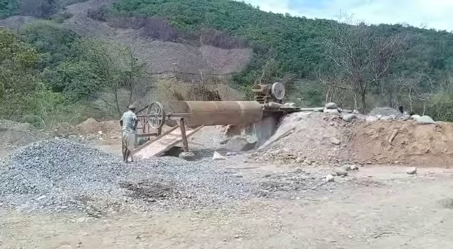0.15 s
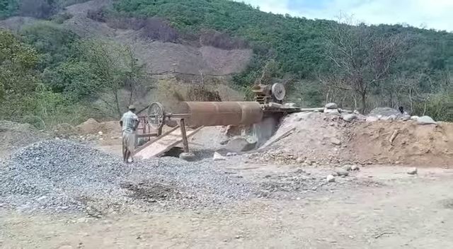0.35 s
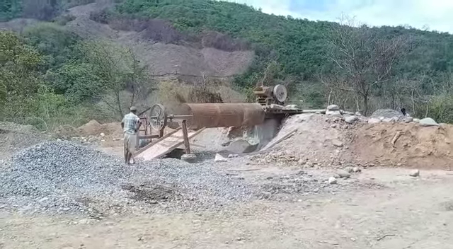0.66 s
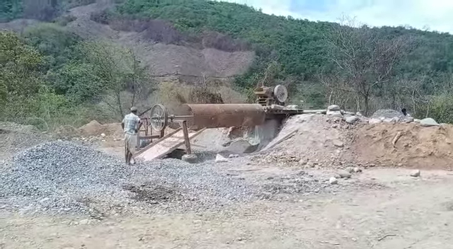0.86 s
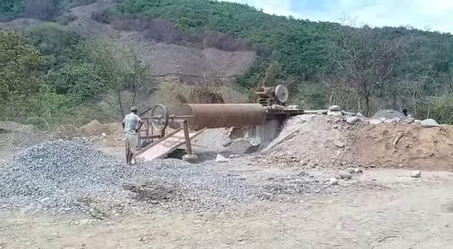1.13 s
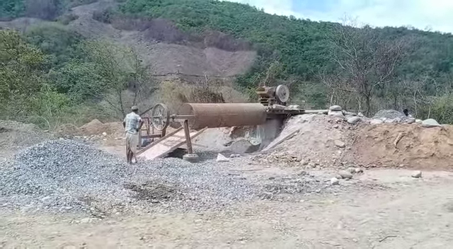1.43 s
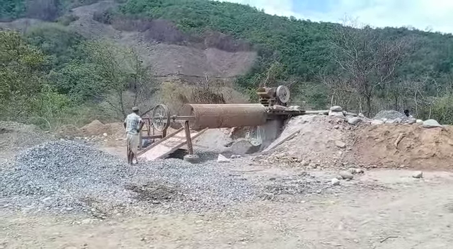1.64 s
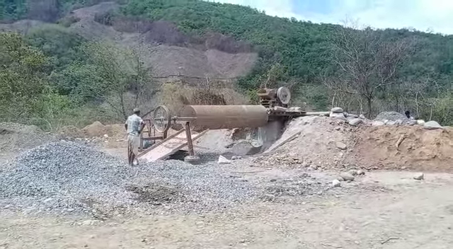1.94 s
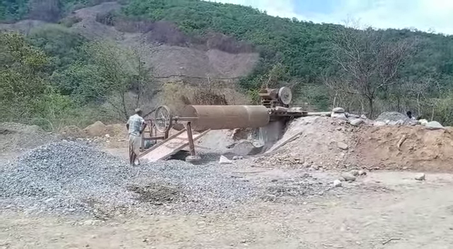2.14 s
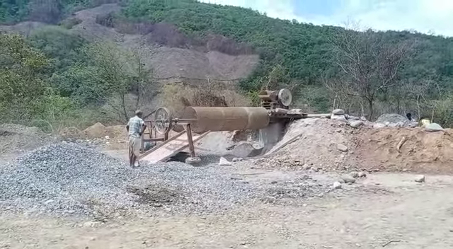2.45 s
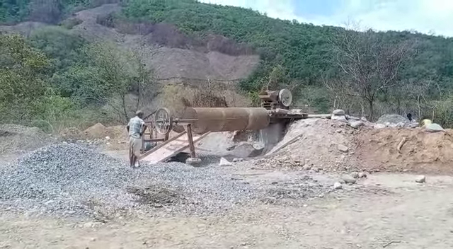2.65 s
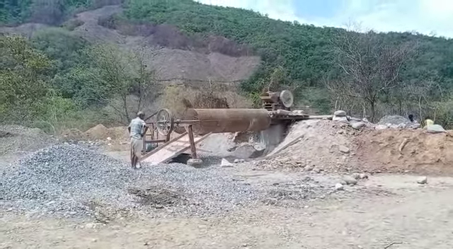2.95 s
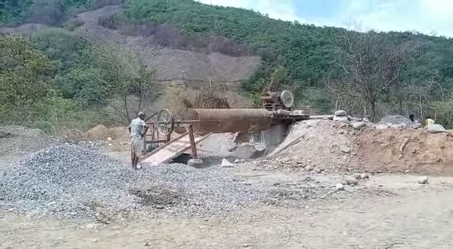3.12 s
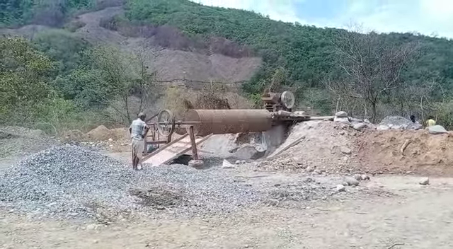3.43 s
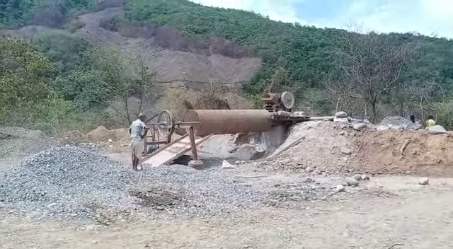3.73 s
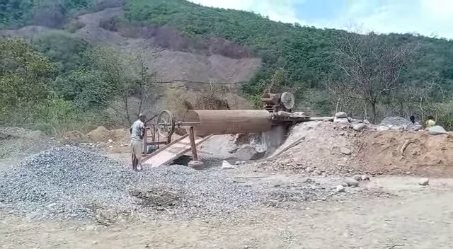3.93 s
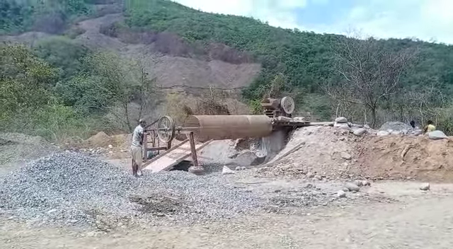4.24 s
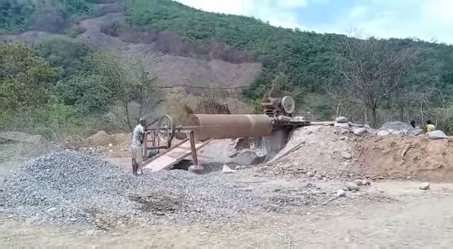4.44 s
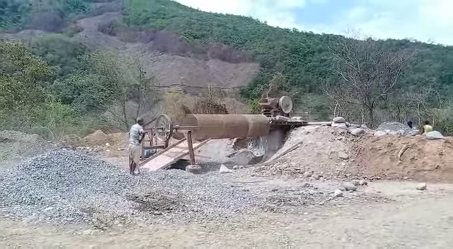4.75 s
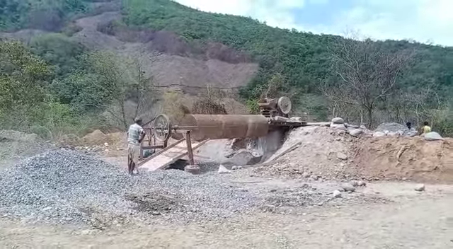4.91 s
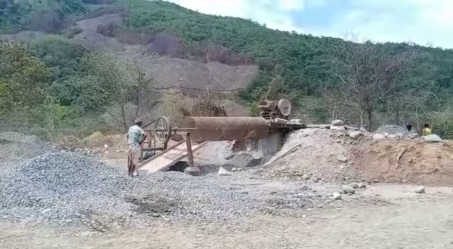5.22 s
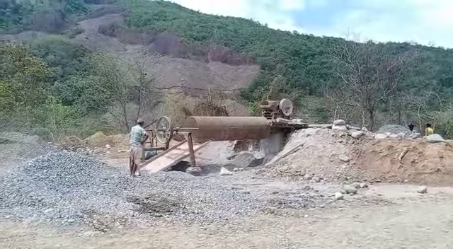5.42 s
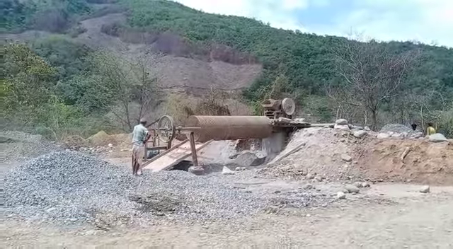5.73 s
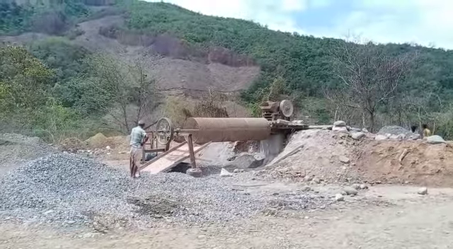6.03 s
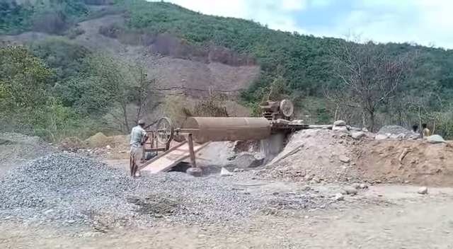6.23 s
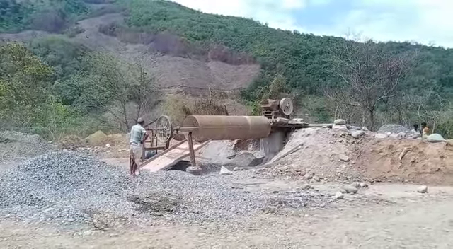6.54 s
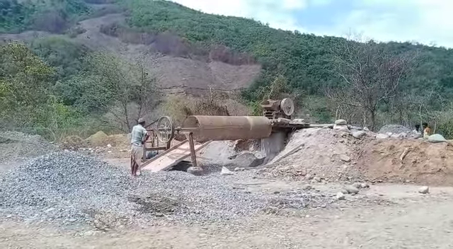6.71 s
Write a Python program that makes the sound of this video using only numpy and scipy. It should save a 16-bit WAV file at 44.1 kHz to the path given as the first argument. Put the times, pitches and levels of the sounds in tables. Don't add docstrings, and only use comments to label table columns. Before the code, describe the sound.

Outdoors at some distance, crushed stone rattles and roars continuously through a turning steel drum, with sharp clinks, gritty spills, rapid dull crusher thumps and motor hum.

```python
import sys
import numpy as np
from scipy import signal
from scipy.fft import rfft, irfft
from scipy.io import wavfile
from scipy.ndimage import map_coordinates

SR = 44100
rng = np.random.default_rng(int(sys.argv[2]) if len(sys.argv) > 2 else 0)


def attenuation_scalar(level_db):
    decades = np.asarray(level_db, float) / 20
    return 10 ** decades


def master_out(mix):
    frames = np.transpose(np.atleast_2d(mix))
    ceiling = np.clip(frames, -1, 1)
    pcm = np.round(ceiling * 32767).astype(np.int16)
    wavfile.write(sys.argv[1], SR, pcm)


N = 302967

# (time [s], share turning [0-1], share turned [0-1]); the rest faces the plant
HEADING = [
    (0, 0.08, 0.06),
    (3.95, 0.24, 0.04),
    (4.08, 0.26, 0.1),
    (4.2, 0.8, 0),
    (4.5, 0.96, 0.39),
    (4.68, 0.48, 0.24),
    (4.85, 0.2, 0.66),
    (5.8, 0.04, 0.81),
    (6.87, 0.06, 0.88),
]
STROKE_S, FIRST_S = 0.1905, 0.106


def unit(x):
    return x / np.sqrt(np.mean(x ** 2) + 1e-20)


def curves(rows):
    s, *cols = np.transpose(rows)
    return [np.interp(np.arange(N) / SR, s, c) for c in cols]


def wobble(rate):
    knots = rng.standard_normal(int(N * rate / SR) + 4)
    return map_coordinates(knots, [np.arange(N) * rate / SR])


def coloured(x, points, size=16384):
    f, db = np.transpose(points)
    bins_hz = np.fft.rfftfreq(size, 1 / SR)
    gain = attenuation_scalar(np.interp(np.log(bins_hz + 1), np.log(f + 1), db))
    cep = irfft(np.log(gain + 1e-6))
    cep[1:size // 2] *= 2
    cep[size // 2 + 1:] = 0
    impulse = irfft(np.exp(rfft(cep)))[:size // 2]
    return unit(signal.fftconvolve(x, impulse)[:N])


def motor():
    orders = {2: -73, 4: -60.5, 14: -62.5, 21: -66.5, 22: -55, 23: -58.5, 24: -54.5, 26: -50, 27: -63, 29:
              -61}
    shaft_hz = 25.386
    t = np.arange(N) / SR
    hum = np.zeros(N)
    for k, db in orders.items():
        turns = k * shaft_hz * t + rng.random()
        hum += attenuation_scalar(db + 3.0 + 0.5 * wobble(1.47)) * np.sin(2 * np.pi * turns)
    return hum


def strokes():
    # (time [s], level [dB])
    breaking = [(0.116, -33.5), (0.461, -31.5), (0.682, -29), (0.866, -31.5), (1.098, -31), (1.248, -32),
                (1.481, -33), (1.625, -35), (2.018, -27.5), (2.238, -35), (2.571, -35), (2.794, -33),
                (3.116, -33.5), (3.333, -33.5), (3.509, -35), (3.71, -34.5), (3.95, -35), (4.277, -31.5),
                (4.476, -32), (4.659, -31), (4.843, -30.5), (5.07, -32), (5.418, -33.5), (5.599, -30),
                (5.831, -32.5), (6, -29.5), (6.173, -31.5), (6.357, -31), (6.593, -35), (6.784, -36.5)]
    idle_db, frame_hz = -35.5, 185.3
    beat = np.arange(FIRST_S, N / SR, STROKE_S)
    draw = rng.standard_normal((3, len(beat)))
    times = beat + 0.0123 * draw[0]
    rows = np.transpose([times, idle_db + 1.5 * draw[1], frame_hz * (1 + 0.0066 * draw[2])])
    for s, db in breaking:
        rows[np.abs(beat - s).argmin(), :2] = s, db
    return rows


def crusher():
    # (frequency [Hz], level [dB per Hz])
    rumble_colour = [(20, -55), (45, -57), (70, -19), (110, -14.5), (140, -3.5), (185, -6), (230, -5),
                     (300, -47)]
    crunch_colour = [(90, -34), (150, -6.5), (183, -5), (215, -4.5), (260, -16.0), (350, -22.5), (480, -57.0)]
    lumps_colour = [(200, -37), (250, -0.5), (330, -7.0), (420, -13.5), (520, -17.0), (600, -40.5)]
    lead = SR // 8
    t = np.arange(-lead, lead) / SR
    knocks, load = np.zeros((2, N + SR))
    white = rng.standard_normal((3, N))
    for s, db, hz in strokes():
        at = round(s * SR)
        swell = 0.4 * np.exp(-(t / 0.014) ** 2) + 0.68 * np.exp(-np.abs(t / 0.058) ** 3)
        knocks[at:][:len(t)] += attenuation_scalar(db - 1.0) * swell * np.sin(2 * np.pi * hz * t)
        load[at:][:len(t)] += attenuation_scalar(db - 7.5) * np.exp(-(t / 0.069) ** 2)
    crunch = load[lead:lead + N] * coloured(white[2], crunch_colour)
    bite = np.cos(2 * np.pi * (np.arange(N) / SR - FIRST_S) / STROKE_S)
    rumble = attenuation_scalar(-46.5 + 1.9 * wobble(9)) * coloured(white[0], rumble_colour)
    lumps = attenuation_scalar(-46.5 + 1.8 * bite + 2.3 * wobble(14)) * coloured(white[1], lumps_colour)
    return knocks[lead:lead + N] + crunch + rumble + lumps


def clinks():
    # (time [s], crack [dB], middle mode ring [dB], top mode over the middle one [dB])
    big_stones = [(1.246, -11.5, -28, 8), (1.6412, -15, -23, -3), (1.8163, -11, -14, -8),
                  (2.1256, -11, -25, 10), (2.3082, -11, -21, 3), (2.5303, -6, -25, 4),
                  (2.7843, -12, -15, -4), (3.2525, -13, -23, 1), (3.5897, -5, -23, 3), (3.733, -8, -21, 11),
                  (3.9943, -13, -12.5, -7), (4.0433, -3, -16, 7), (4.577, -10, -16, 7),
                  (4.6927, -11, -16, -2), (4.7465, -13, -26, 6), (5.4024, -13, -26, 5),
                  (5.631, -12, -15, -3), (6.196, -14, -16, -5), (6.41, -12, -13.5, -6), (6.535, -6, -14, 9),
                  (6.684, -10, -17, -5), (6.8326, -5, -11, 1)]
    # (frequency [Hz], t60 [s])
    wall_modes = [(1250, 0.02), (2650, 0.022), (3800, 0.017)]
    low_mode_db = -29
    out = np.zeros(N + SR)
    t = np.arange(SR // 25) / SR
    onset = 1 - np.exp(-t / 0.00044)
    place = 1 + 0.022 * rng.standard_normal((len(big_stones), len(wall_modes)))
    for (s, crack_db, ring_db, top_db), shift in zip(big_stones, place):
        hit = attenuation_scalar(crack_db - 5 - 60 * t / 0.0095) * np.sin(2 * np.pi * 3600 * t)
        mode_levels = low_mode_db, ring_db, ring_db + top_db
        for (hz, t60), db, k in zip(wall_modes, mode_levels, shift):
            hit += attenuation_scalar(db + 1.0 - 60 * t / t60) * np.sin(2 * np.pi * k * hz * t)
        out[round(s * SR):][:len(t)] += onset * hit
    echo = np.pad(out, (63, 0))[:N]
    return out[:N] + 0.36 * echo


def stones(lo_hz, hi_hz, ring_s, blur, count):
    draw = rng.random((count, 4))
    t = np.arange(640) / SR
    hz = lo_hz + (hi_hz - lo_hz) * draw[:, 1:2]
    size = attenuation_scalar(8.2 * draw[:, 2:3])
    decay = attenuation_scalar(-60 * t / (ring_s * (0.32 + draw[:, 3:])))
    chips = size * decay * np.sin(2 * np.pi * hz * t)
    at = (draw[:, :1] * N).astype(int) + np.arange(len(t))
    hits = np.bincount(at.ravel(), chips.ravel(), N + len(t))[:N]
    band = [(0.8 * lo_hz, -60), (lo_hz, 0), (hi_hz, 0), (1.2 * hi_hz, -60)]
    far = coloured(rng.standard_normal(N), band)
    return np.sqrt(1 - blur) * unit(hits) + np.sqrt(blur) * far


def headed(x, spectra):
    turning, turned = np.clip(curves(HEADING), 0, 1)
    shares = np.abs(1 - turning - turned), turning, turned
    return sum(share * coloured(x, points) for share, points in zip(shares, spectra))


def spills():
    # (time [s], dust peak [dB], grit over dust [dB])
    handfuls = [(0.1834, -25, -12), (0.5267, -20, -13), (0.7444, -26, -14), (0.9253, -27, -10),
                (1.2156, -26, -10), (1.3544, -24, -10), (1.6704, -28, -8), (2.1246, -28, -10),
                (2.2124, -24, -10), (2.7604, -26, -13), (2.8674, -19, -10), (2.9614, -29, -10),
                (3.0594, -28, -10), (3.3618, -30, -10), (3.8854, -26, -10), (4.1114, -25, -10),
                (4.1974, -24, -10), (4.2732, -29, -10), (4.3425, -29, -10), (4.4303, -24, -8),
                (4.7824, -27, -8), (4.9531, -27, -10), (5.0843, -24, -10), (5.1811, -24, -10),
                (5.3814, -22, -11), (5.655, -28, -10), (5.7623, -21, -10), (6.3375, -27, -10),
                (6.49, -24.5, -5), (6.7386, -26, -7)]
    small = [(s * N / SR, -30 + 2.5 * (2 * u - 1), -8) for s, u in rng.random((24, 2))]
    env = np.zeros((2, N + SR))
    t = np.arange(SR // 4) / SR
    fall = attenuation_scalar(-60 * t / 0.23) * (1 - np.exp(-t / 0.0026))
    for s, dust_db, grit_db in list(handfuls) + small:
        peaks_db = np.minimum(dust_db, -21) + np.array([-9, grit_db - 0.5])
        env[:, round(s * SR):][:, :len(t)] += np.outer(attenuation_scalar(peaks_db) ** 2, fall ** 2)
    return env[:, :N]


def stream():
    # (time [s], coarse stone [dB], fines [dB])
    feed = [(0.2, -17.5, -41.5), (0.65, -18, -42), (1.15, -18.5, -43.5), (1.7, -18, -40.5),
            (2.09, -18.5, -43), (2.99, -18.5, -41), (3.67, -19, -44), (4.29, -18, -41), (4.47, -22, -51),
            (4.7, -19, -43.5), (5.81, -19, -39), (6.01, -19, -40.5), (6.8, -19.5, -44.5), (6.87, -18, -41)]
    # (time [s], gravel change [dB], shell change [dB])
    clumps = [(.15, 1.5, 1.5), (.9, 2.5, 1.5), (1.2, -1, 2.5), (1.53, -2.5, 2.5), (1.84, -1, 4),
              (2.16, 3.5, 0.5), (2.35, -2.5, -3), (2.9, 2.5, -1), (3.02, 0.5, 5), (3.25, -2.5, -2),
              (3.57, -0.5, -1), (3.62, 5.5, -0.5), (4.05, 0, 3), (3.77, -1, -2), (3.95, -3.5, 2),
              (4.26, -3, -0.5), (5.15, -2, 2.5), (.5, -1, -2.5), (4.57, -1, 1.5), (5.32, -3, 0.5),
              (5.62, -2, 0.5), (5.78, 2, -3.5), (5.83, -1.5, -1), (5.88, 2, 2), (6.01, -1, -0.5),
              (6.43, -4, 1), (6.53, 1.5, -3), (6.72, -3.5, -0.5), (6.76, 2.5, -0.5)]
    clump_s = 0.021
    gravel_db, dust_db = curves(feed)
    turning, turned = curves(HEADING)
    t = np.arange(N) / SR
    gravel_more, shell_more = sum(np.outer(db, np.exp(-((t - s) / clump_s) ** 2)) for s, *db in clumps)
    shell_db = np.mean(gravel_db) - 7 - turned + shell_more
    mean_dust_db = np.mean(dust_db)
    grit_db = mean_dust_db + 0.6 * (dust_db - mean_dust_db) - 1 + 3.5 * turned + 3.5 * turning
    return shell_db, gravel_db + gravel_more + 0.24, grit_db, dust_db + 0.3


def screen():
    # (frequency [Hz], level [dB per Hz])
    shell_colour = [(380, -39.5), (490, -24), (640, -10), (860, -4.5), (980, -9.5), (1250, -0.5),
                    (1560, -9.5), (1980, -1.5), (2250, -8.5), (2620, 1.5), (2900, -9), (3120, -11),
                    (3400, -9), (3800, -48.5)]
    # (frequency [Hz], level [dB per Hz])
    gravel_ahead = [(1760, -41.5), (3000, -9.5), (3110, -21.5), (3350, -6.5), (3630, -11.0), (3970, -4.0),
                    (4290, -7), (4730, -5.0), (5130, -6.5), (5860, -0.5), (6680, -4.5), (7230, -17.5),
                    (7600, -31), (9880, -56), (16700, -120)][:-2] + [(8200, -36), (9000, -120)]
    gravel_turning = [(1760, -54), (3000, -18), (3700, -5.5), (4000, -4.5), (4580, -1.5), (5070, -4.0),
                      (5570, 2.5), (5880, -4.5), (6090, -9), (6380, -19), (7000, -12.5), (7600, -12),
                      (9880, -45), (16700, -120)][:-2] + [(8200, -44), (9000, -120)]
    gravel_turned = [(1760, -32.5), (3000, -45), (3220, -39), (3400, -3.0), (3590, -10.5), (3980, -5),
                     (4550, -4.0), (4950, -6.0), (5460, 1.5), (6760, -4), (7600, -22), (9880, -30),
                     (16700, -120)][:-2] + [(8200, -53), (9000, -120)]
    # (frequency [Hz], level [dB per Hz])
    fine_ahead = [(4400, -27), (7500, -0.5), (7900, -5.5), (9300, -14), (10100, -15), (11000, -15.5),
                  (11500, -22.5), (12200, -17), (13000, -6), (13800, -3), (14800, -3.5), (15600, -13)]
    fine_turning = [(4410, -21), (7500, -5), (8660, -9), (10400, -33), (10800, -27), (12100, -11),
                    (12700, -6), (14500, -5), (15000, -10), (15600, -23)]
    fine_turned = [(4400, -26), (7500, -0.5), (8700, -3), (9400, -12.5), (10400, -18), (11100, -19),
                   (11500, -25), (12000, -15), (12700, -8), (13600, -3.5), (14700, -4), (15600, -20)]
    shell_db, gravel_db, grit_db, dust_db = stream()
    surge, sift = wobble(14), wobble(10)
    dust_spill, grit_spill = spills()

    shell = coloured(stones(305, 4202, 0.034, blur=0.76, count=4000), shell_colour)
    shell *= attenuation_scalar(shell_db + 0.27 * surge + 0.65 * wobble(15))

    gravel = stones(1680, 9006, 0.042, blur=0.86, count=4000)
    gravel = headed(gravel, (gravel_ahead, gravel_turning, gravel_turned))
    gravel *= attenuation_scalar(gravel_db + 0.5 * surge + 0.17 * wobble(30))
    gravel *= 1 + 6 * np.sqrt(dust_spill)

    fine = stones(4400, 16500, 0.049, blur=0.85, count=4000)
    fine = headed(fine, (fine_ahead, fine_turning, fine_turned))
    fine *= attenuation_scalar(0.87 * surge + 0.48 * sift)
    grit = signal.sosfiltfilt(signal.butter(8, 11000, fs=SR, output="sos"), fine)
    dust = unit(fine - grit) * np.sqrt(attenuation_scalar(dust_db + 1.1 * wobble(18)) ** 2 + dust_spill)
    grit = unit(grit) * np.sqrt(attenuation_scalar(grit_db + 0.46 * wobble(18)) ** 2 + grit_spill)
    return shell + gravel + grit + dust


def scene():
    return np.tile(motor() + crusher() + clinks() + screen(), (2, 1))


def split_bands():
    # (frequency [Hz], level [dB per Hz])
    split_colour = [(20, -34), (50, -18), (90, -1), (200, -2), (400, -12), (540, -12), (600, -100)]
    z = signal.stft(coloured(rng.standard_normal(N), split_colour), nperseg=2048)[2]
    chance, strength = rng.random((2, 257, z.shape[1])).repeat(4, axis=1)[:, :len(z)]
    blobs = (chance < 0.14) * attenuation_scalar(9 * strength)
    return attenuation_scalar(-55.5) * signal.istft(z * blobs, nperseg=2048)[1][:N]


def band_limit(x):
    return signal.sosfilt(signal.butter(12, 15520, fs=SR, output="sos"), x)


def record(dry):
    dry = dry * attenuation_scalar(-5 * np.exp(-np.arange(N) / SR / 0.1))
    held = dry / (1 + np.abs(dry / 0.56) ** 5) ** (1 / 5)
    held = dry + signal.sosfiltfilt(signal.butter(8, 7400, fs=SR, output="sos"), held - dry)
    mix = held + np.outer([1, -1], split_bands())
    return band_limit(mix)


dry = scene()
out = record(dry)
master_out(out)
```